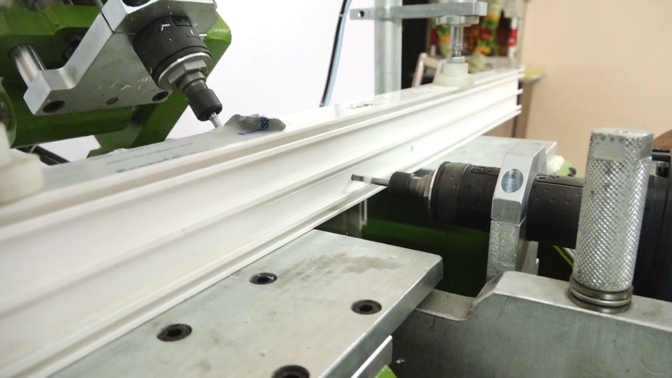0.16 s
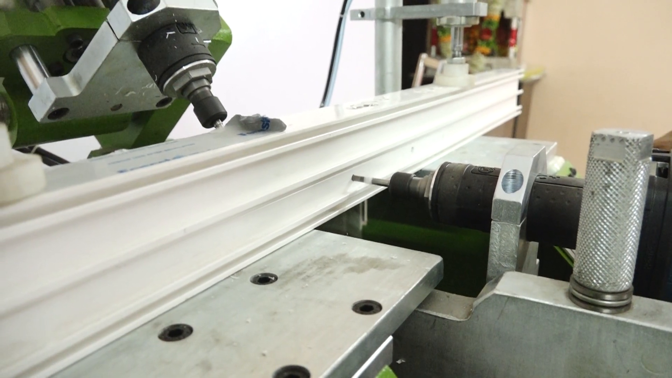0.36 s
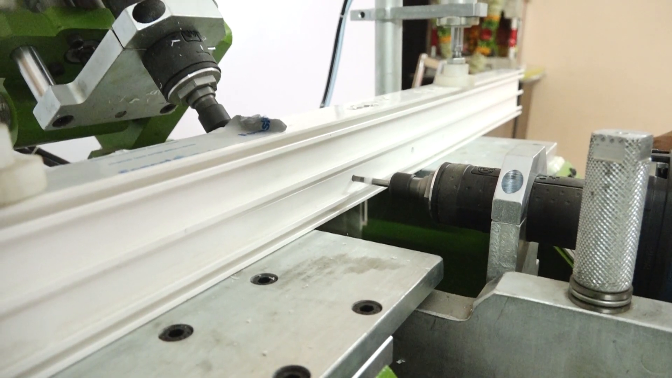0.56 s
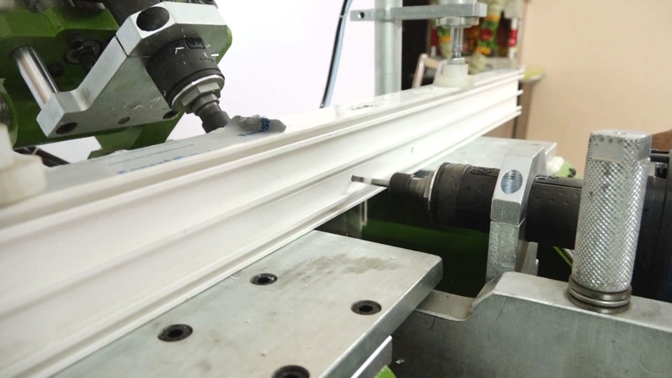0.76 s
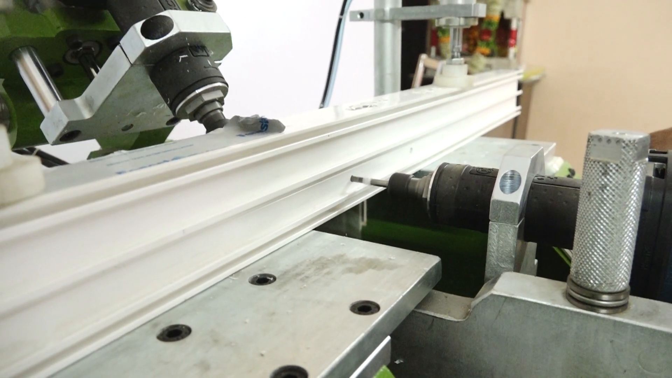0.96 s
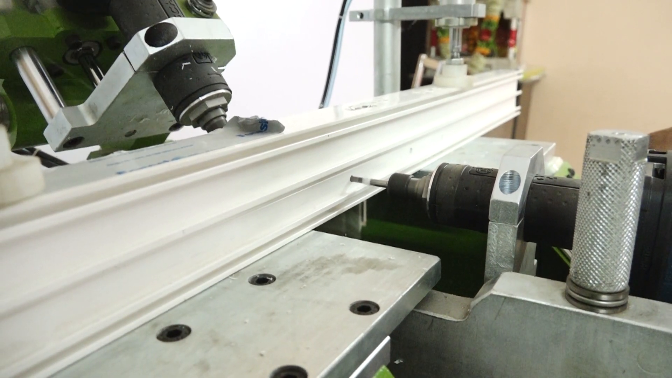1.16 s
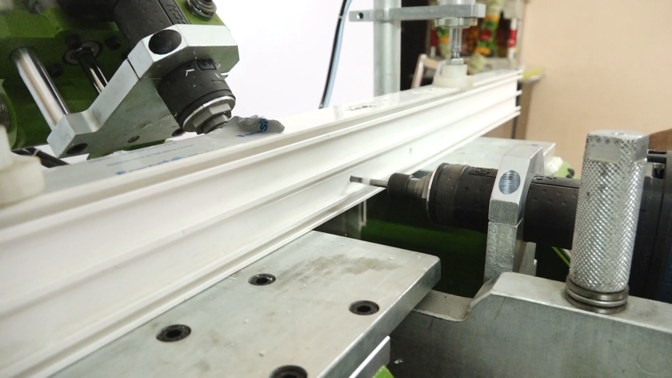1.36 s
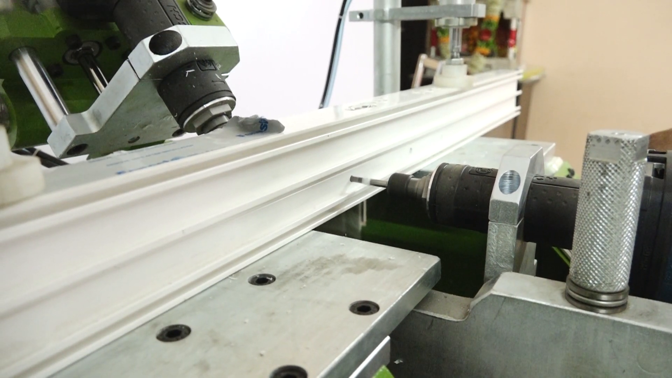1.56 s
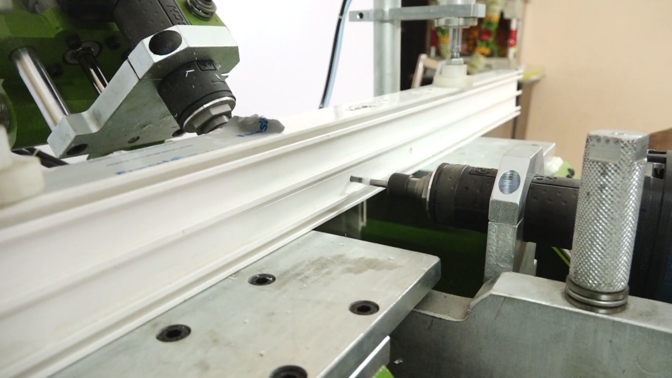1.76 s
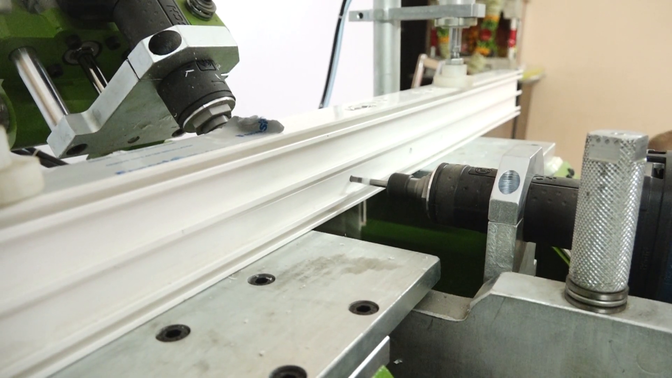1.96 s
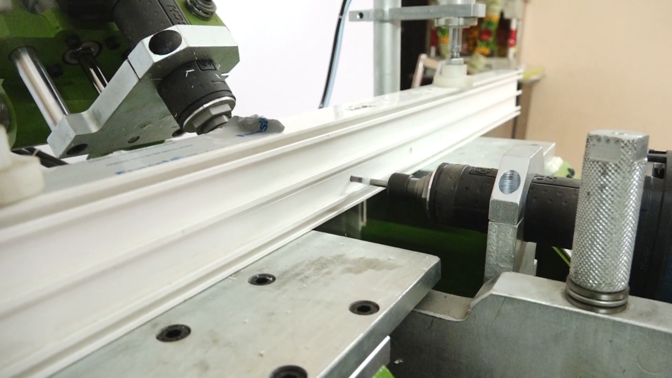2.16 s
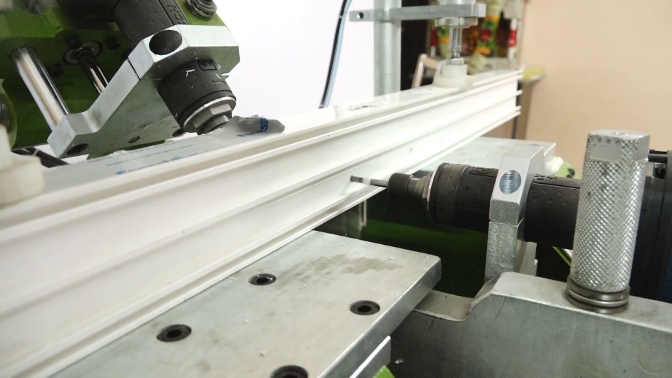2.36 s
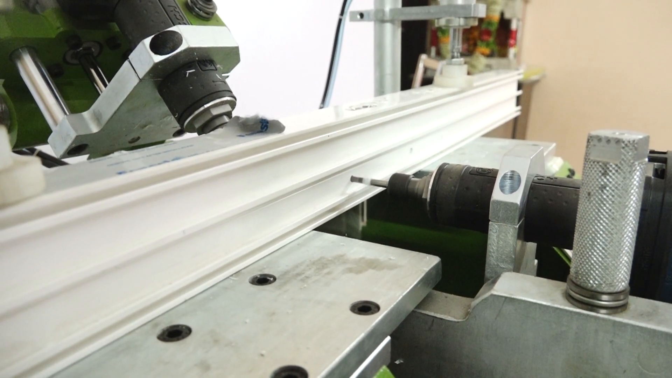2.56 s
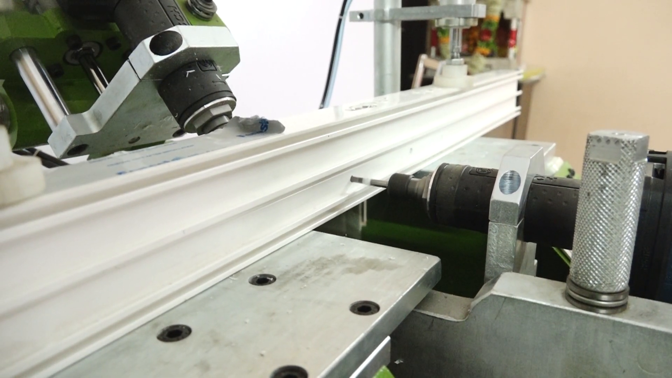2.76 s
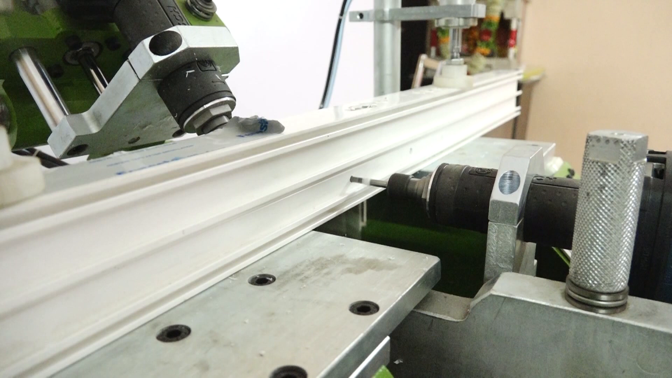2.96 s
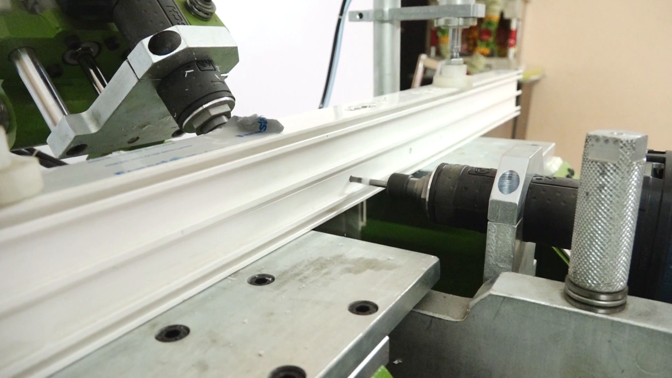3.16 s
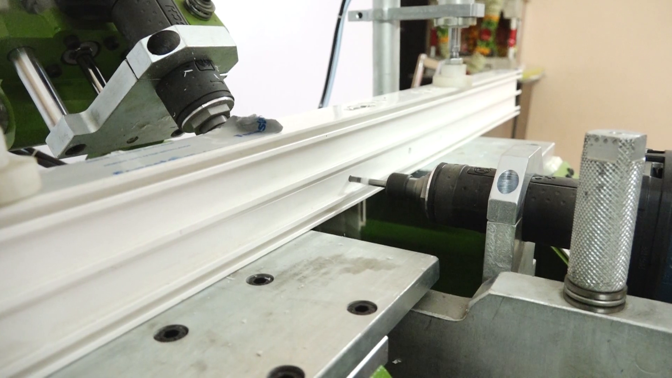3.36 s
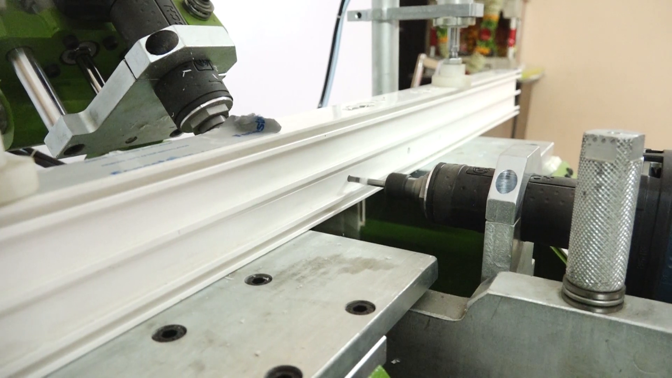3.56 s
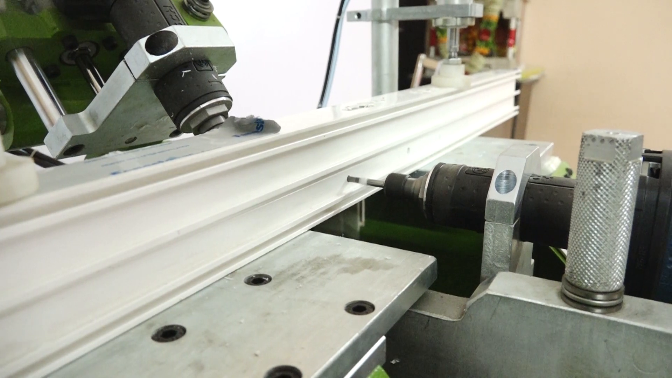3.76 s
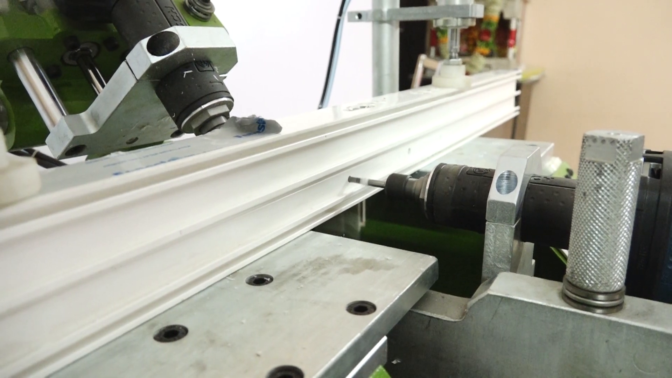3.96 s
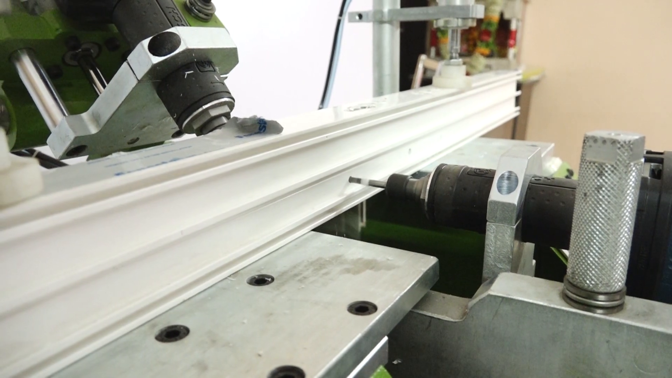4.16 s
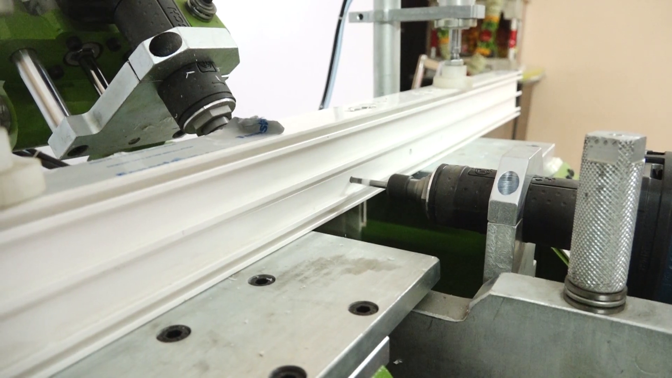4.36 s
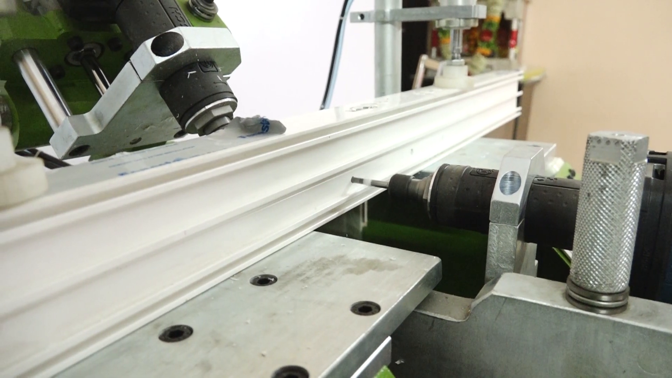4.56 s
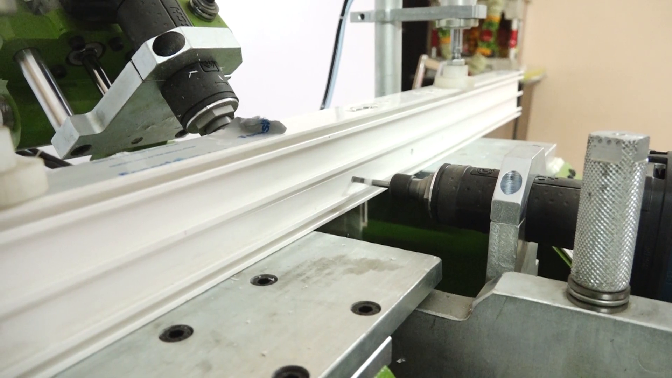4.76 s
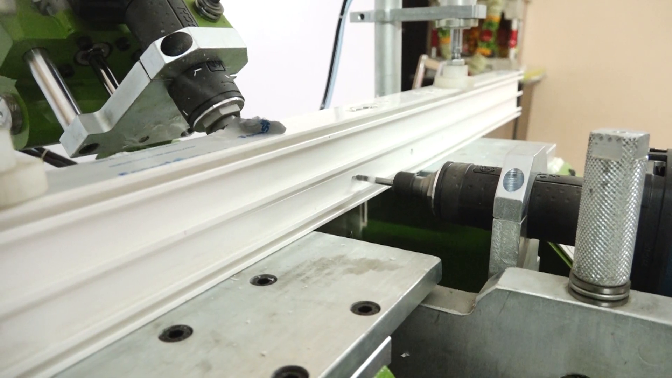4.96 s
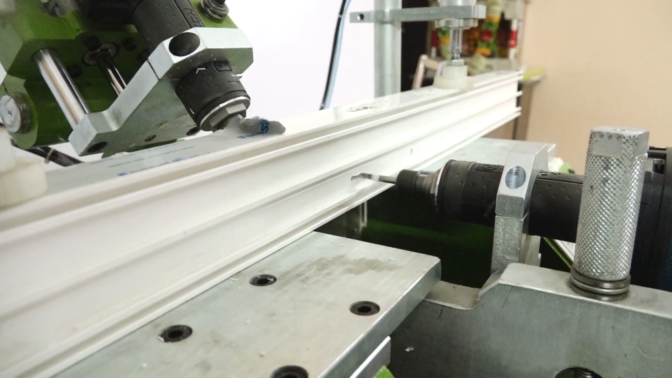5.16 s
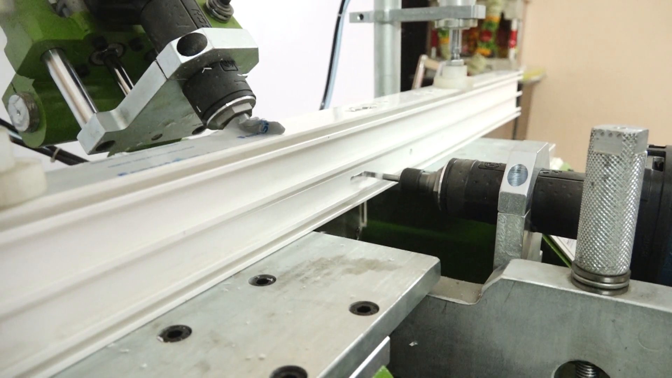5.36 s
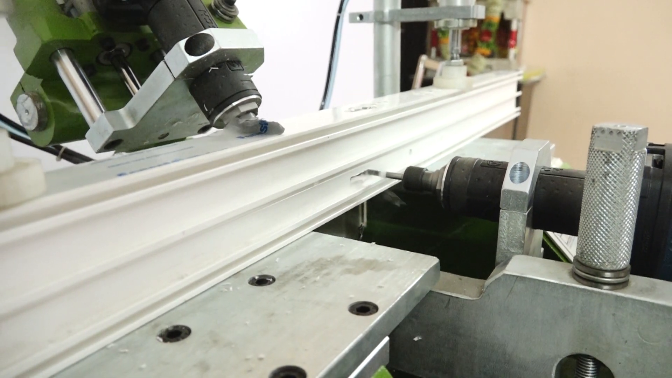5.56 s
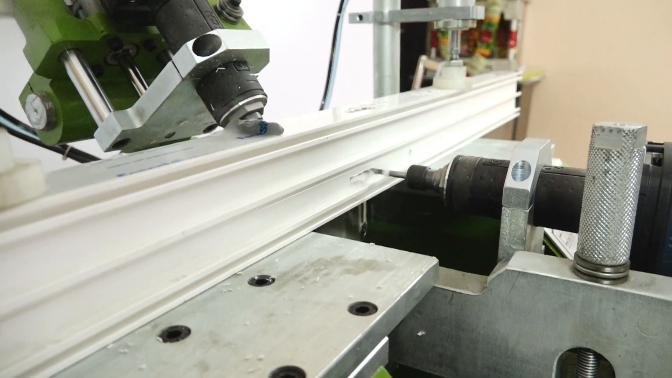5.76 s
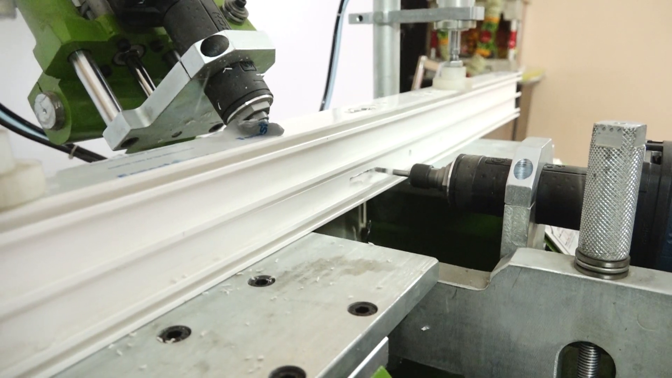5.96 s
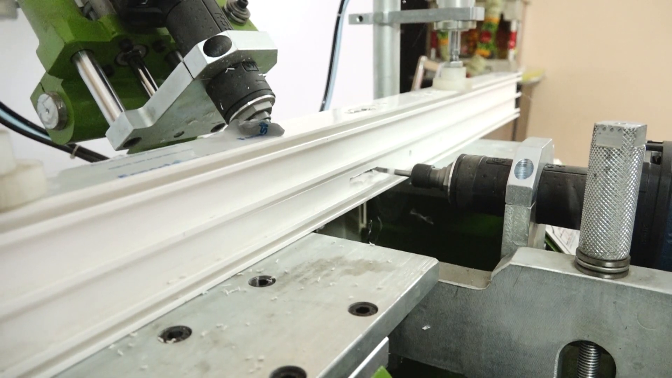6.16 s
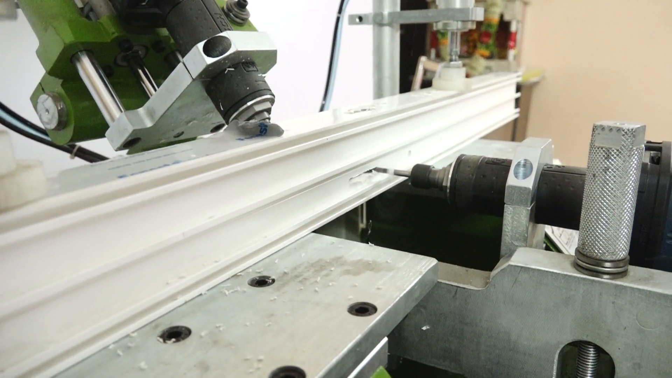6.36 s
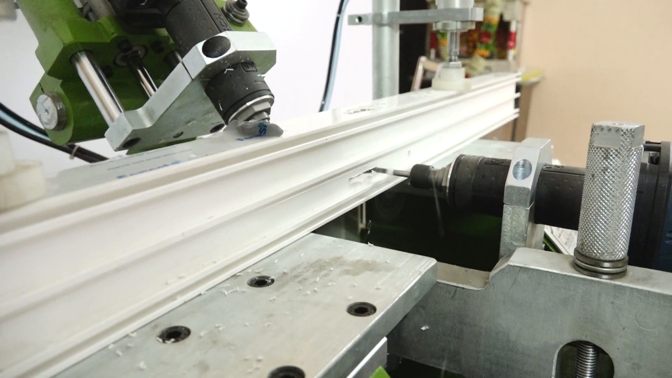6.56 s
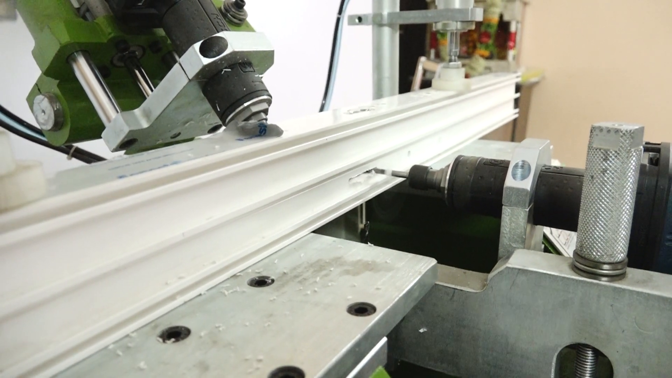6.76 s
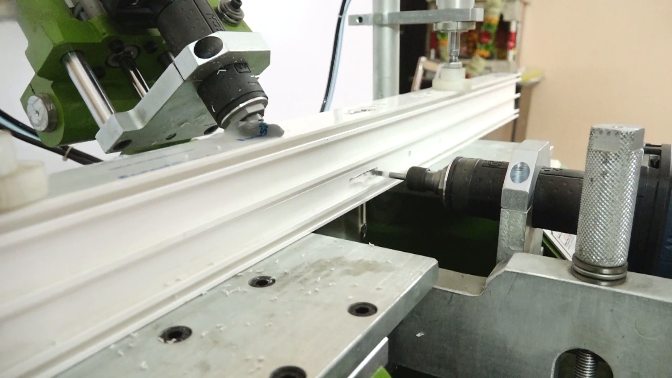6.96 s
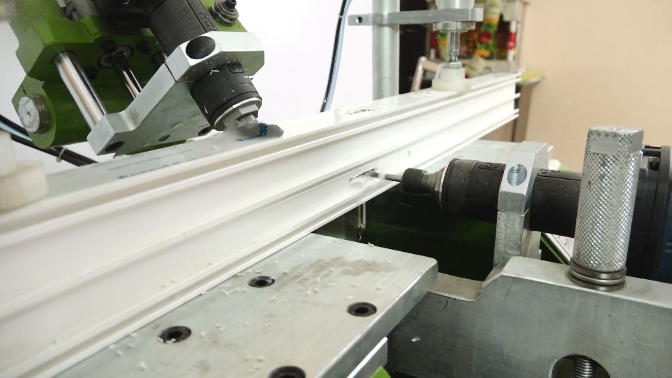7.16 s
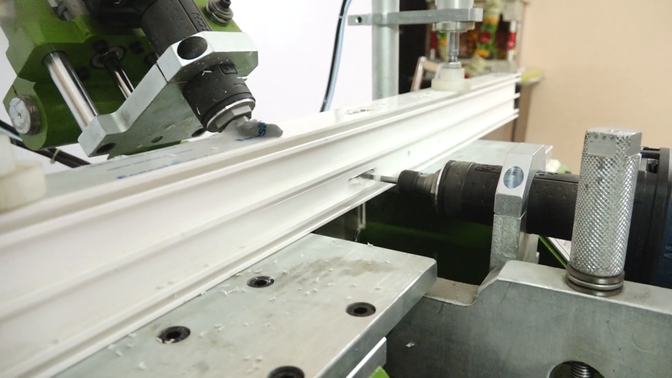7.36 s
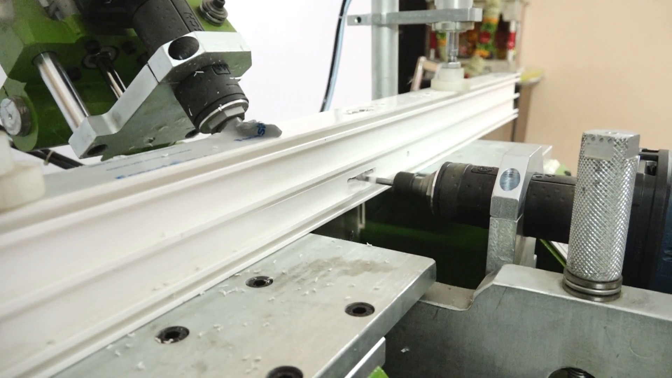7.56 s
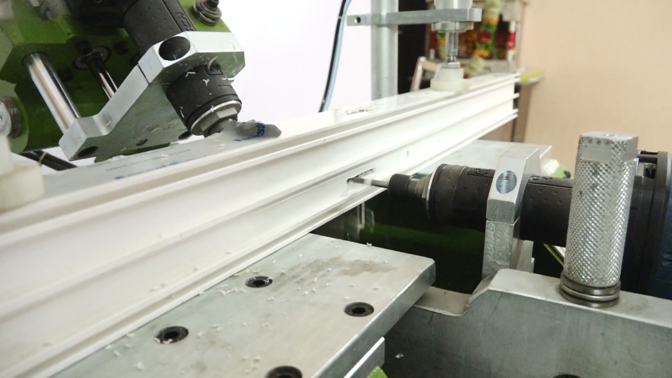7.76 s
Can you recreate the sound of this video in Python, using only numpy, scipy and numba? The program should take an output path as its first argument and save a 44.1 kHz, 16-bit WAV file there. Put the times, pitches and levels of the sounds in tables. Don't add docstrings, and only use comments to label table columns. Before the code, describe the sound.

Close up in a small workshop, two router spindles run with hissing fans. One whines steadily while the farther one runs up in pitch and briefly nicks plastic around one second. Near five seconds both plunge into a hollow plastic profile, sagging in pitch with a loud, rough, buzzing chatter and spraying chips. They pull out, rise back in pitch, then cut a slot with a shrill, rattling whine.

```python
import sys
import numpy as np
from scipy import signal
from scipy.fft import irfft, next_fast_len
from scipy.io import wavfile
from scipy.ndimage import uniform_filter1d
from numba import njit

SR = 44100
rng = np.random.default_rng(int(sys.argv[2]) if len(sys.argv) > 2 else 0)


def transcribe(u):
    v = np.clip(np.atleast_2d(u).T, -1, 1)
    q = np.round(v * 32767).astype(np.int16)
    wavfile.write(sys.argv[1], SR, q)


def amplitude_ratio(level_db):
    exponent = np.asarray(level_db, float) / 20
    return 10 ** exponent


N = 343539
STEP = 64

# (time [s], plunging [0-1], slotting [0-1], chatter [0-1],
# pulsing of the noise once a turn [0-1], dulling of a shallow bite [dB per order])
WORK = [(0, 0, 0.1, 0, 0.1, 0), (4.78, 0, 0, 0, 0.18, 0.5), (4.86, 0.83, 0.04, 0.46, 0.5, 0.5),
        (5.0, 0.42, 0.16, 0.93, 0.2, 0), (5.2, 0.93, 0.13, 0.57, 0, 0), (5.35, 0.97, 0.14, 0.5, 0.3, 0),
        (5.7, 0.94, 0.1, 0.46, 0.8, 0), (6.05, 0.91, 0, 0.16, 0, 0), (6.22, 0.93, 0.19, 0.29, 0.3, -0.2),
        (6.3, 0.34, 0.4, 0.3, 0.7, 0.5), (6.62, 0, 0.58, 0, 0.4, 1), (6.7, 0.25, 0.7, 0.1, 0, 0.5),
        (6.91, 0.07, 0.8, 0.36, 0.2, 0.4), (6.97, 0, 0.93, 0.28, 0.19, 0.24),
        (7.79, 0, 1, 0.33, 0.39, -0.06)]
# (time [s], shaft speed [Hz])
UPPER_SPEED = [(0, 401), (.25, 458), (.55, 484), (.95, 508), (1.06, 506), (1.17, 491), (1.35, 501),
               (2.5, 522.9), (3.8, 527.6), (4.81, 530.2), (5.0, 503.6), (5.25, 480.5), (5.7, 459.7),
               (6.14, 451), (6.45, 483.5), (6.7, 500), (6.9, 507), (7.79, 508)]
# (start [s], attack [s], hold [s], release [s], strength [0-1])
PLUNGE = [
    (4.8, 0.086, 1.276, 0.096, 0.93),
]
# (start [s], attack [s], hold [s], release [s], strength [0-1])
CLEAR = [
    (6.2, 0.12, 0.41, .05, 0.63),
]
CLEAR_DB = -5


def front():
    # (time [s], shaft speed [Hz])
    speed = [(0, 516.7), (1.0, 518.4), (2.0, 517.4), (4.8, 517.6), (4.9, 499.5), (5.0, 463), (5.1, 443.7),
             (5.2, 429.5), (5.33, 415.5), (5.5, 405.3), (5.75, 397), (6.11, 393.5), (6.28, 426),
             (6.45, 458), (6.57, 473.5), (6.72, 484.8), (6.9, 488.8), (7.79, 490.5)]
    # (time [s], level of its knock [dB])
    bite = [(0, -23.5), (4.79, -25), (4.85, -8.5), (5.0, -8), (5.3, -5.5), (5.52, -5), (5.7, -11),
            (5.9, -12), (6.05, -11), (6.17, -9.5), (6.225, -15), (6.25, -27), (6.66, -29), (6.7, -19),
            (6.83, -18.5), (7.0, -12.5), (7.79, -11)]
    # (time [s], half length [s], lift [dB])
    housing_rings = [
        (1.7, 0.66, 3.5),
        (2.8, 0.46, -3),
        (5.08, 0.11, -7),
        (5.42, 0.11, -6),
        (6.08, 0.042, 0),
        (6.285, 0.028, -8),
        (6.41, 0.016, -8),
        (6.62, 0.014, -2),
    ]
    # (time [s], half length [s], lift [dB])
    low_rings = [
        (4.89, .05, 7),
        (6.18, 0.062, -8),
        (7.4, 0.042, 1),
    ]
    free_orders = [-37.4, -31.5, -32.5, -32, -32.5, -37, -47, -38.5, -36.5, -39, -36.5, -35.5, -32, -36,
                   -40.5, -41.5, -41.5, -39.5, -40.5, -38, -45, -40, -68, -65, -63, -59, -63]
    plunge_orders = [-34, -32, -31, -28, -36, -30, -31.5, -29.5, -32.5, -29.5, -30.5, -27.5, -30.5, -33.5,
                     -31, -33, -28.5, -27.5, -29, -33.5, -27, -32.5, -32, -33.5, -33, -34, -31]
    slot_orders = [-34.1, -30.5, -36, -57, -27, -29, -20, -24.5, -23.5, -32, -36, -33, -34, -21.5, -27.5,
                   -32, -31, -35, -32, -37, -46, -38, -35, -37, -51.6, -50.6, -48]
    # (time [s], half length [s], pitch [Hz], lift [dB])
    walls = [ (4.9, .06, 4480, 7), (4.91, .06, 6950, 8), (4.94, .05, 3370, 7), (5.0, .1, 3650, 12),
             (5.26, .17, 3800, 6), (5.22, .1, 4750, 4), (5.48, .22, 5290, 13), (5.35, .18, 5800, 8),
             (5.6, .16, 1615, 8), (5.98, .16, 6730, 6), (5.85, .16, 7160, 4), (6.0, .1, 6330, 6),
             (6.17, .065, 3200, 12), (6.13, .05, 3960, 7), (6.86, .12, 4880, 9), (6.93, .1, 6360, 8),
             (7.66, .3, 5395, 12), (7.45, .1, 5880, 5), (4.88, .05, 9200, 8), (7.2, .3, 4405, -1),
             (7.25, .3, 8320, 5), (6.78, .12, 6840, -8), (6.76, .08, 3410, 5), (5.3, .27, 2300, -9),
             (5.0, .1, 2450, -6), (5.89, .2, 1190, 6), (6.45, .23, 2250, -9), (5.35, .15, 820, -5)]
    wall_width_hz = 240
    frame_hz, frame_reach_hz, frame_lift_db = 440.4, 55, 19
    bogged_hz, bogged_span_hz, bogged_db = 415.6, 12.3, 12.5
    muffle_hz, muffle_db_per_khz = 7440, 1.5

    (hz,), (high_db,) = curve(speed), curve(bite)
    slotting = curve(WORK)[1]
    frame_db = frame_lift_db * np.exp(-((hz - frame_hz) / frame_reach_hz) ** 2)
    shaft_db = -41 + frame_db + swells(housing_rings) + 0.7 * walk(7.7)
    bogged = np.clip((bogged_hz - hz) / bogged_span_hz, 0, 1)
    low_db = -26 + 0.46 * (high_db - high_db[0]) - 11.5 * strokes(PLUNGE) - 4.5 * slotting
    low_db = low_db + swells(low_rings) + bogged_db * bogged + 0.6 * CLEAR_DB * strokes(CLEAR)

    db = blend(free_orders, plunge_orders, slot_orders)
    fading = db[-1] - 3 - 0.5 * np.arange(1, 12)[:, None]
    db = np.vstack([db, fading])
    order = np.arange(1, len(db) + 1)
    db = db - np.outer(order, curve(WORK)[4])
    order_hz = np.outer(order, hz)
    db = db - muffle_db_per_khz * strokes(PLUNGE) * np.maximum(order_hz - muffle_hz, 0) / 1e3
    t = control_times()
    for s, half, wall_hz, lift_db in walls:
        passing = np.exp(-((t - s) / half) ** 4)
        db = db + lift_db * passing * np.exp(-((order_hz - wall_hz) / wall_width_hz) ** 2)
    orders_db = [shaft_db, *share(db[1:4], low_db), *share(db[4:], high_db)]
    return sing(hz, orders_db, wander_db=0.25, wide=0.2)


def upper():
    # (time [s], level of its second order [dB])
    bite = [(0, -52), (.85, -43.5), (1.04, -22.5), (1.14, -23.5), (1.3, -58), (2.3, -42), (4.74, -62),
            (4.84, -16), (4.93, -16.5), (4.96, -27), (6.16, -37.5), (6.66, -42), (6.7, -31.5), (7.0, -21.5),
            (7.35, -22), (7.56, -24.5), (7.79, -13)]
    # (time [s], half length [s], lift [dB])
    rings = [
        [(1.09, 0.12, 17.5), (2.45, 0.1, 6.5), (2.97, 0.6, 13), (.2, 0.067, 6), (1.95, 0.48, -12),
         (4.87, .05, 4), (5.9, 0.14, 6.5), (6.85, .1, 9.5), (7.79, 0.073, 8)],
        [(5.12, 0.048, 2), (5.86, .1, 14)],
        [(1.07, 0.046, -9), (4.82, 0.054, 6), (5.8, 0.22, 13), (6.11, 0.061, 14), (6.8, 0.18, 13.5),
         (7.27, .2, 14.5)],
    ]
    # (time [s], half length [s], lift [dB])
    sixth_rings = [
        (5.01, .025, 5),
        (5.11, 0.049, 19),
    ]
    free_orders = [-53, -47, -50, -51, -43, -50, -54, -42, -44, -49, -55]
    plunge_orders = [-63, -34, -26.5, -24.5, -24, -30, -26.5, -50.1, -54, -39, -23.5]
    slot_orders = [-31.5, -34, -38, -27.5, -29.5, -33, -45, -46, -36, -34, -45.6]

    (hz,), (bite_db,) = curve(UPPER_SPEED), curve(bite)
    shaft_db = -44.5 + 18 * strokes(PLUNGE) + 9 * curve(WORK)[1]
    third_db = -29 + 0.67 * (bite_db - bite_db[-1] + 9.5)
    first_db = [db + swells(rows) for db, rows in zip((shaft_db, bite_db, third_db), rings)]
    high_db = blend(free_orders, plunge_orders, slot_orders) + CLEAR_DB * strokes(CLEAR)
    high_db[2] += swells(sixth_rings)
    return sing(hz, [*first_db, *high_db], wander_db=-2.0, wide=0.19, start_turns=-0.16)


def sing(hz, orders_db, wander_db, wide, start_turns=0):
    chatter = curve(WORK)[2]
    turn = 2 * np.pi * (start_turns + np.cumsum(fine(hz)) / SR)
    turn = turn + fine(0.05 * chatter * walk(60))
    gain = np.sqrt(2) * amplitude_ratio(np.array(orders_db)) / np.sqrt(1 + chatter ** 2)
    for k in range(len(gain)):
        reach = min(0.5 + k / 4.4, 1)
        wander = amplitude_ratio(wander_db * (0.29 + chatter) * reach * walk(5.1))
        gain[k] *= wander * (1 + 0.45 * chatter * reach * walk(40))
    lean = -np.exp(0.7j * rng.standard_normal((2, len(gain))))
    mid, side = stack(turn, gain, lean, STEP)
    return np.array([mid, side * fine(wide * (0.57 + chatter))]), turn


@njit
def stack(turn, gain, lean, step):
    out = np.zeros((2, len(turn)))
    for i in range(len(turn)):
        j, part = i // step, (i % step) / step
        spin = np.exp(1j * turn[i])
        z = spin
        for k in range(len(gain)):
            g = gain[k, j] + part * (gain[k, j + 1] - gain[k, j])
            out[0, i] += g * (z * lean[0, k]).real
            out[1, i] += g * (z * lean[1, k]).imag
            z *= spin
    return out


def noise(turn):
    # (free [dB], more when plunging [dB], tearing [dB], slotting [dB])
    layers = [
        (-52.5, 10.5, 16.7, 2.3),
        (-35, 11.5, 2.2, 3),
        (-23.5, 10.5, 5.5, 3.4),
        (-25.5, -0.5, 10.5, .3),
    ]
    # (start [s], attack [s], hold [s], release [s], strength [0-1])
    tears = [
        (4.82, .16, .17, .17, 1),
        (6.03, .07, 0.0091, 0.048, 0.58),
    ]
    # (start [s], attack [s], hold [s], release [s], lift [dB])
    carriage = [
        (5.1, 0.2, .2, .3, 4.8),
        (6.35, 0.033, 0.31, .04, 8.3),
        (7.1, .25, .5, .1, 9),
    ]
    # (start [s], attack [s], hold [s], release [s], more chips [dB])
    nick = [
        (.98, .04, .03, .04, 3.2),
    ]
    # (start [s], attack [s], hold [s], release [s], strength [0-1])
    spray = [
        (4.84, .1, .62, .06, 1),
        (6.03, .07, .08, .05, .8),
    ]

    fan_hz = curve(UPPER_SPEED)[0]
    plunging, slotting, _, pulsing, _ = curve(WORK)
    plunge = strokes(PLUNGE)
    state = np.array([np.ones(len(fan_hz)), plunge, strokes(tears), slotting])
    rumble_db, hollow_db, chips_db, top_db = np.array(layers) @ state
    rumble_db = rumble_db + strokes(carriage)
    hollow_db = hollow_db + 3 * strokes(CLEAR)
    fan_db = 0.0468 * (fan_hz - fan_hz.max()) * (1 - plunge)
    chips_db = chips_db + fan_db + strokes(nick) - 3.5 * plunging
    top_db = top_db + fan_db
    pulse = 1 + fine(pulsing) * np.cos(turn)
    flutter_db = 0.36 * walk(25.0)

    rumble_colour = [(30, 0), (120, -4.0), (400, -8.5)]
    out = fine(amplitude_ratio(rumble_db + 0.92 * walk(8.3))) * band(29, 520, 0.06, rumble_colour)
    out += fine(amplitude_ratio(hollow_db + 0.5 * walk(8.7))) * band(703, 2920, 0.42)
    out += fine(amplitude_ratio(hollow_db - 11.0 - 3.5 * plunging)) * band(277, 643, 0.66)
    out += fine(amplitude_ratio(chips_db + flutter_db + 0.38 * walk(31))) * pulse * band(3110, 7800, 0.12)
    out += fine(strokes(spray) * amplitude_ratio(-31)) * band(12500, 18900, 0.1, [(30, 0), (9000, 0)])
    out += fine(amplitude_ratio(top_db + flutter_db + 0.5 * walk(22))) * pulse * band(7970, 17000, 0.1)
    return out


def band(lo_hz, hi_hz, shake, colour=None):
    # (frequency [Hz], level [dB per Hz])
    air = [(30, -74.9), (120, -69), (300, -79), (450, -69), (800, -67), (1500, -65.5), (2500, -67),
           (3300, -64), (4500, -62.5), (6000, -63.5), (8500, -63.5), (11000, -67), (13500, -71),
           (15800, -73)]
    # (frequency [Hz], level [dB])
    apart_table = [(60, -47), (110, -49), (200, -47), (380, -38), (700, -23), (1290, -37), (2380, -52),
                   (4400, -20), (8120, -11.5), (15000, -0.5)]
    size = next_fast_len(N, real=True)
    f = np.maximum(np.fft.rfftfreq(size, 1 / SR), 1)
    colour_hz, colour_db = np.transpose(air if colour is None else colour)
    shape = amplitude_ratio(np.interp(np.log(f), np.log(colour_hz), colour_db))
    shape = shape / np.sqrt((1 + (lo_hz / f) ** 10) * (1 + (f / hi_hz) ** 10))
    apart_hz, apart_db = np.transpose(apart_table)
    apart = amplitude_ratio(np.interp(np.log(f), np.log(apart_hz), apart_db))
    chance = rng.standard_normal((3, len(f), 2)) @ [1, 1j]
    mid, side, loose = irfft(chance * [shape, shape * apart, shape], size)[:, :N]
    side = side + shake * fine(curve(WORK)[2] - 0.1) * loose
    return np.array([mid, side]) / mid.std()


def faint():
    # (start [s], end [s], pitch [Hz], level [dB])
    tones = [
        (6.197, 6.713, 394, -40),
        (6.781, 7.654, 1223, -39),
    ]
    t = np.arange(N) / SR
    out = np.zeros(N)
    for start, end, hz, db in tones:
        ends = np.clip(np.minimum(t - start, end - t) / 0.024, 0, 1)
        out += np.sqrt(2) * amplitude_ratio(db) * ends * np.sin(2 * np.pi * hz * t)
    return out


def room(x, t60_s=1.1, wet_db=-17, wide=0.6):
    t = np.arange(int(SR)) / SR
    tail = rng.standard_normal((2, len(t))) * amplitude_ratio(-60 * t / t60_s) * (t > 0.012)
    tail = signal.lfilter([0.5], [1, -0.5], tail)
    tail = tail / np.sqrt(np.sum(tail[0] ** 2)) * [[1], [wide]]
    return amplitude_ratio(wet_db) * signal.fftconvolve(x[None], tail, axes=1)[:, :N]


def control_times():
    return np.arange(0, N + STEP, STEP) / SR


def curve(table):
    s, *columns = np.transpose(table)
    return [np.interp(control_times(), s, c) for c in columns]


def fine(control):
    return np.interp(np.arange(N), np.arange(len(control)) * STEP, control)


def walk(rate):
    size = int(SR / STEP / rate)
    w = rng.standard_normal(N // STEP + 2)
    w = uniform_filter1d(uniform_filter1d(w, size), size)[:(N - 1) // STEP + 2]
    return w / w.std()


def blend(free, plunge, slot):
    plunging, slotting = np.clip(curve(WORK)[:2], 0, 1)
    return np.outer(free, 1 - plunging - slotting) + np.outer(plunge, plunging) + np.outer(slot, slotting)


def share(db, total_db):
    return db - 10 * np.log10(np.sum(amplitude_ratio(db) ** 2, axis=0)) + total_db


def strokes(rows):
    t = control_times()
    total = np.zeros(len(t))
    for s, rise, hold, fall, size in rows:
        end = s + rise + hold + fall
        total += size * np.clip(np.minimum((t - s) / rise, (end - t) / fall), 0, 1)
    return total


def swells(rows):
    t = control_times()
    return sum(lift_db * np.exp(-((t - s) / half) ** 2) for s, half, lift_db in rows)


def scene():
    # (time [s], half length [s], level [dB])
    stumbles = [
        (5.625, 0.014, -2),
        (5.7, 0.011, -1),
        (5.76, 0.01, -0.5),
        (5.815, 0.013, -1),
        (5.93, 0.017, -1),
    ]
    (near, turn), (far, far_turn) = front(), upper()
    plunging, slotting = (fine(c) for c in curve(WORK)[:2])
    lined_up = np.cos(far_turn - turn)
    tones = near * (1 + (0.37 * plunging + 0.04 * slotting) * lined_up) + far
    mix = tones + room(tones[0]) + noise(turn) * (1 + 0.19 * plunging * lined_up)
    mid, side = fine(amplitude_ratio(swells(stumbles))) * mix
    side = side + 0.015 * np.diff(mid, 2, prepend=0, append=0) + 0.11 * np.gradient(mid)
    return np.array([mid + side, mid - side]) + faint()


def low_pass(x):
    return signal.sosfilt(signal.butter(12, 15980, fs=SR, output="sos"), x)


def record(dry):
    soft = 0.72 * np.tanh(dry / 0.72)
    return low_pass(soft - soft.mean(axis=1, keepdims=True))


dry = scene()
out = record(dry)
transcribe(out)
```